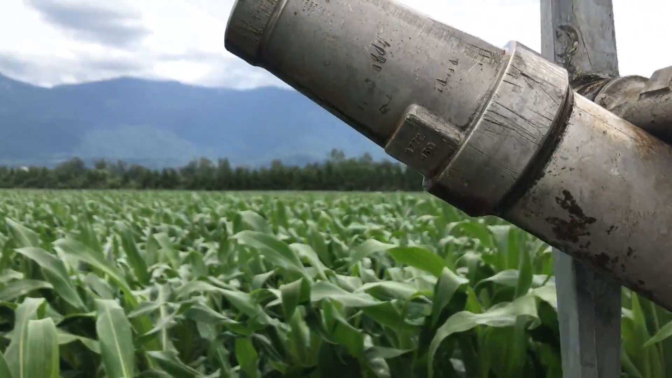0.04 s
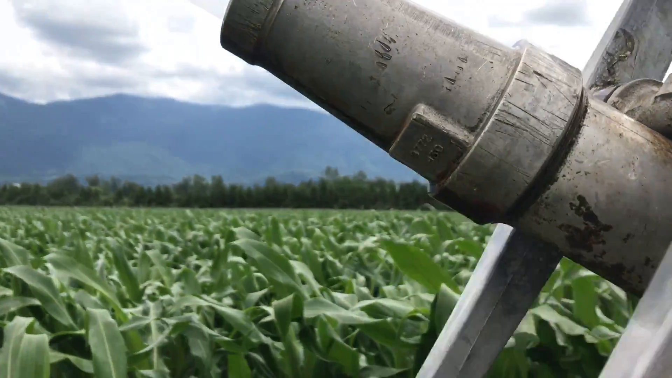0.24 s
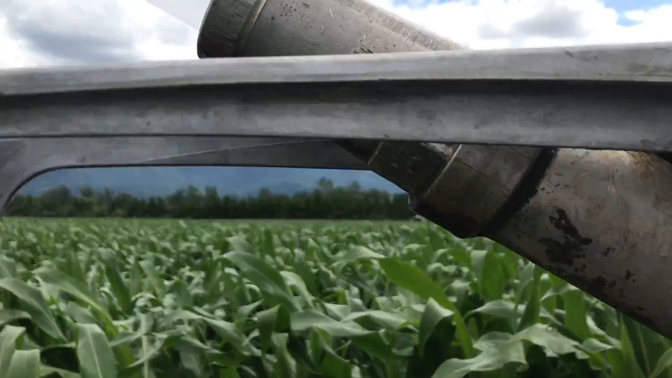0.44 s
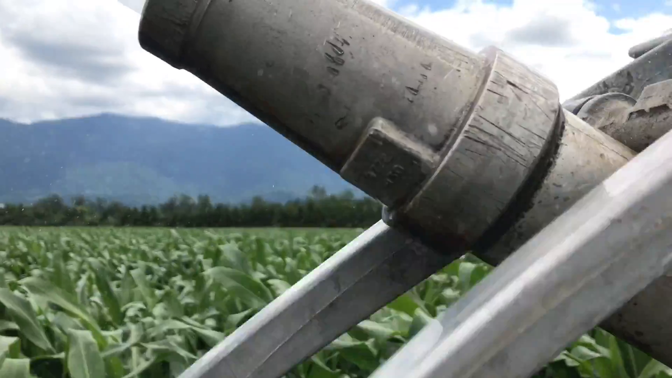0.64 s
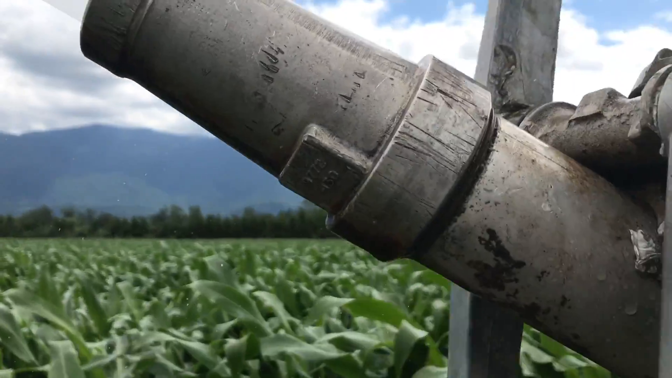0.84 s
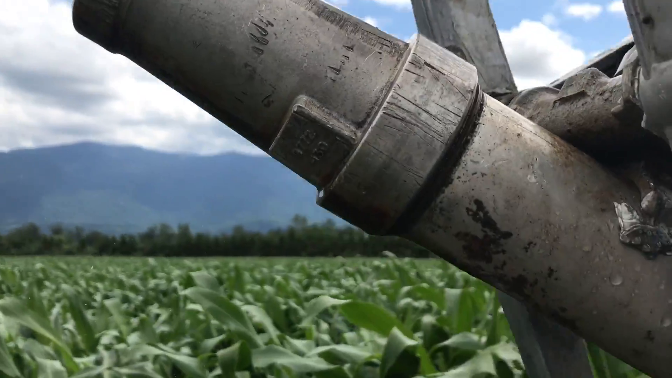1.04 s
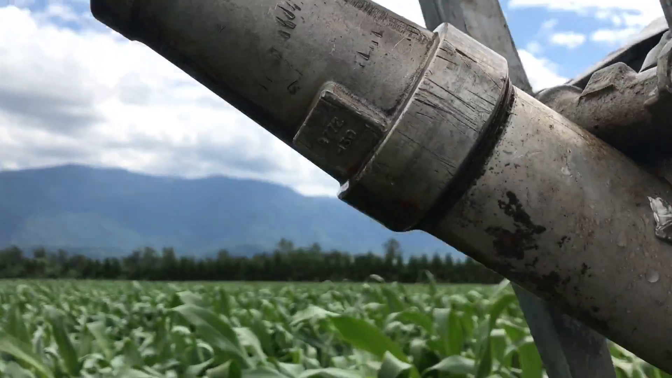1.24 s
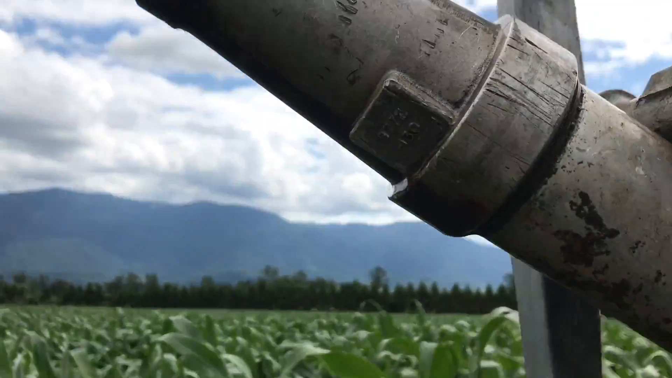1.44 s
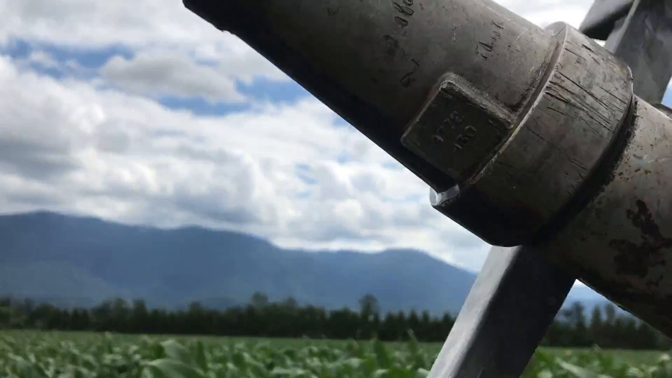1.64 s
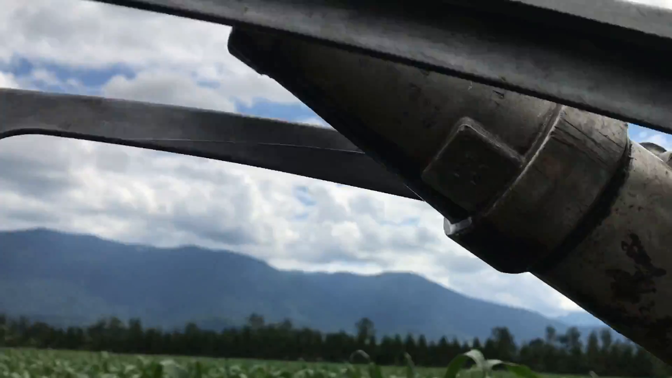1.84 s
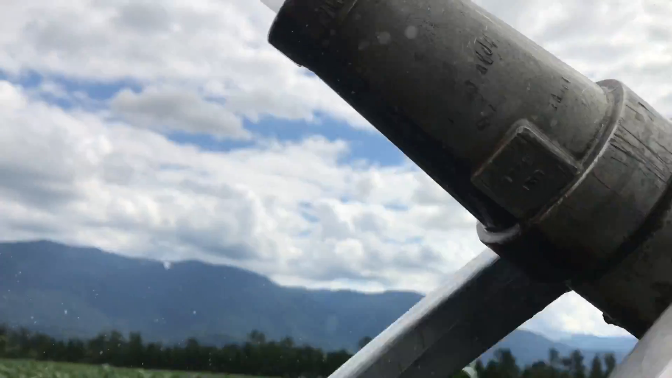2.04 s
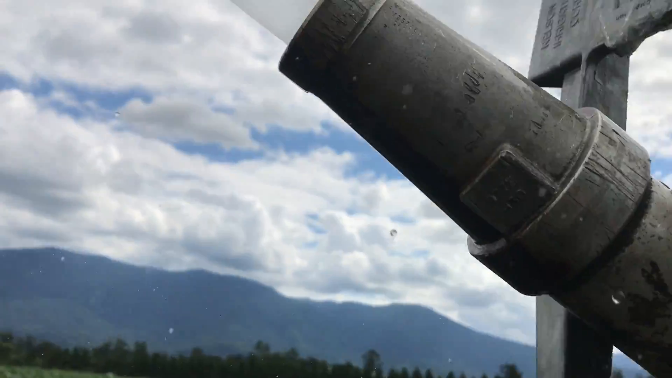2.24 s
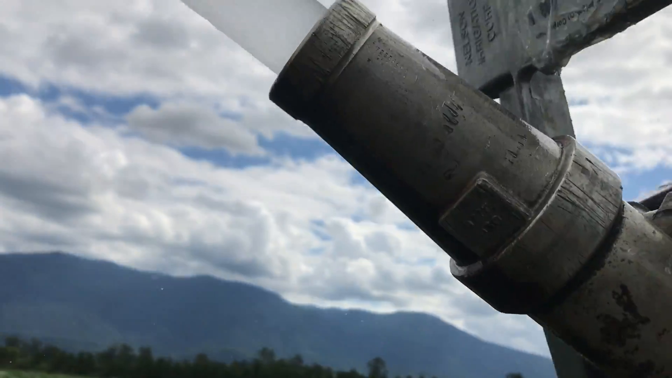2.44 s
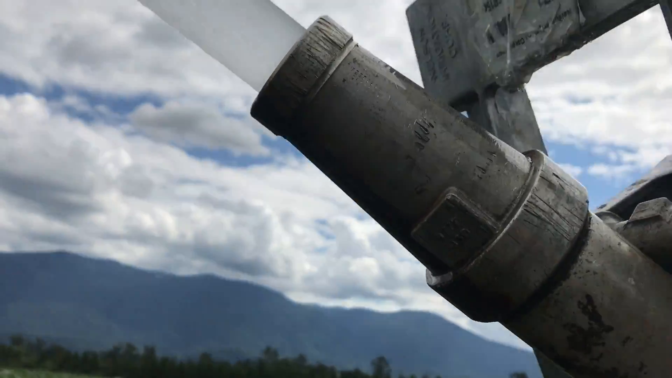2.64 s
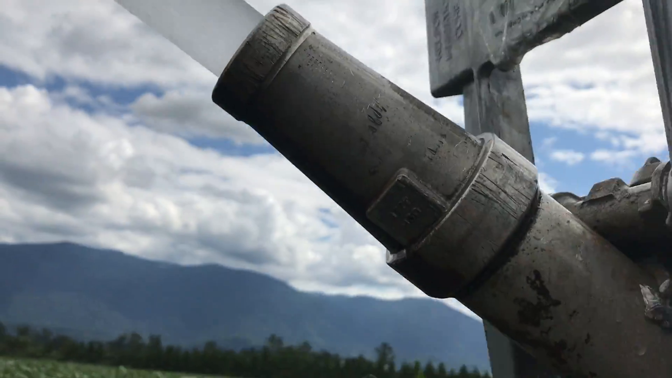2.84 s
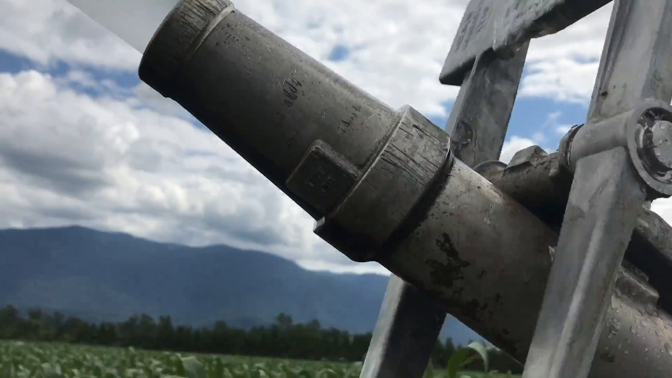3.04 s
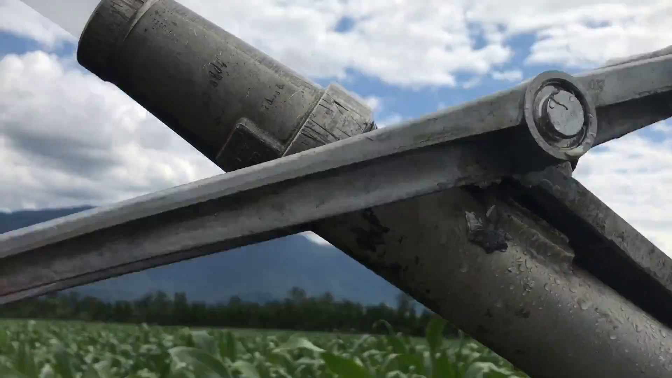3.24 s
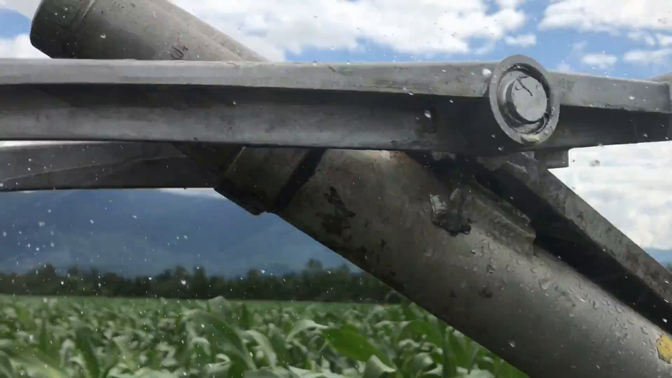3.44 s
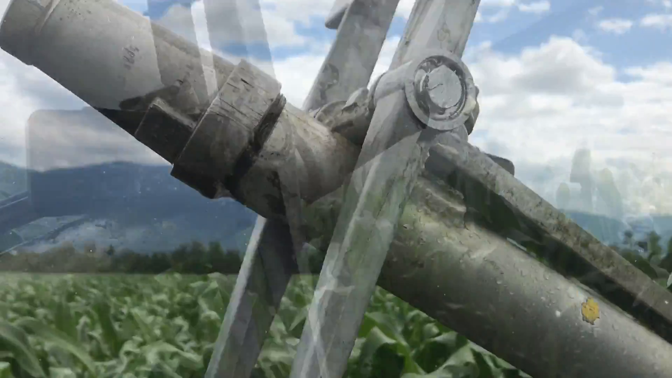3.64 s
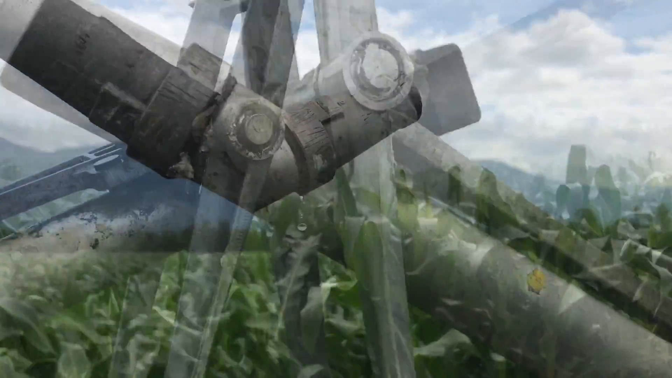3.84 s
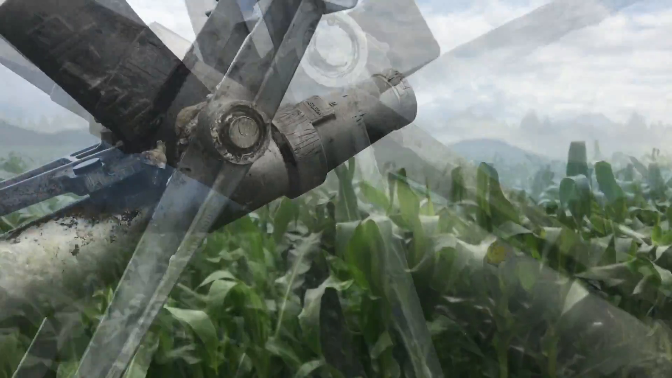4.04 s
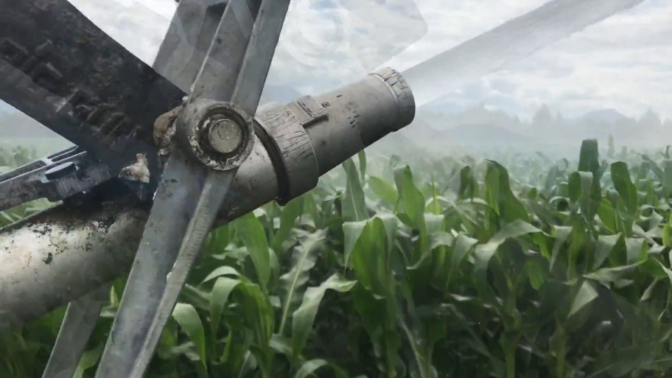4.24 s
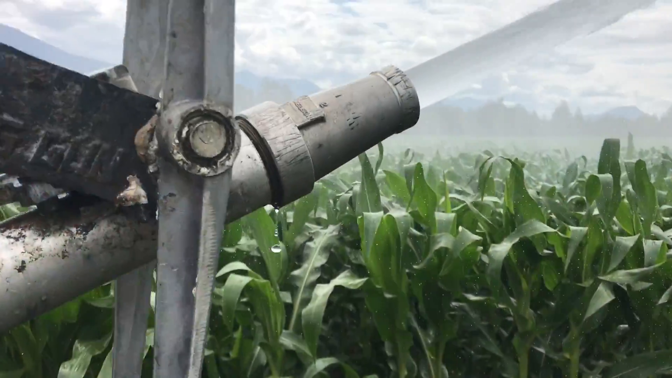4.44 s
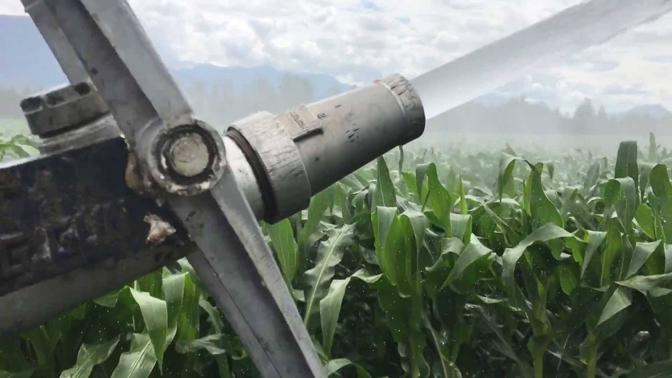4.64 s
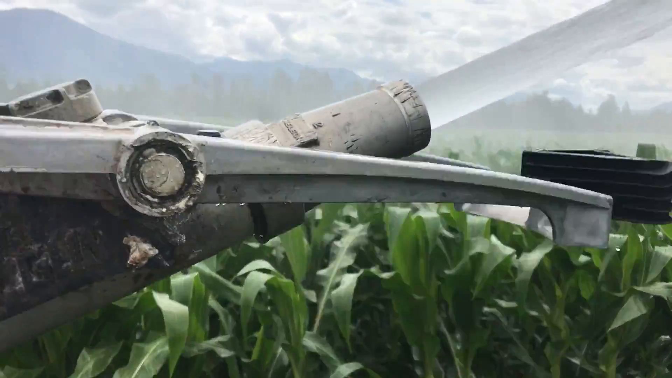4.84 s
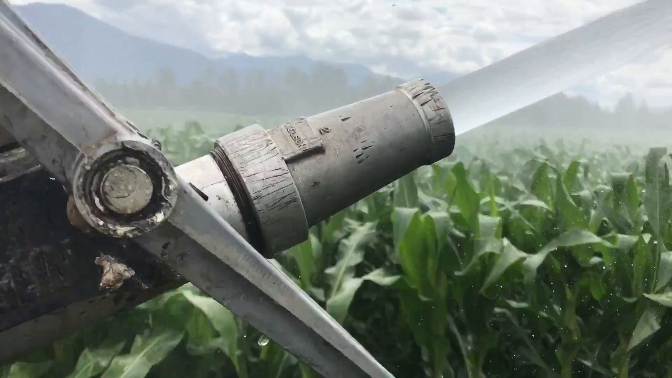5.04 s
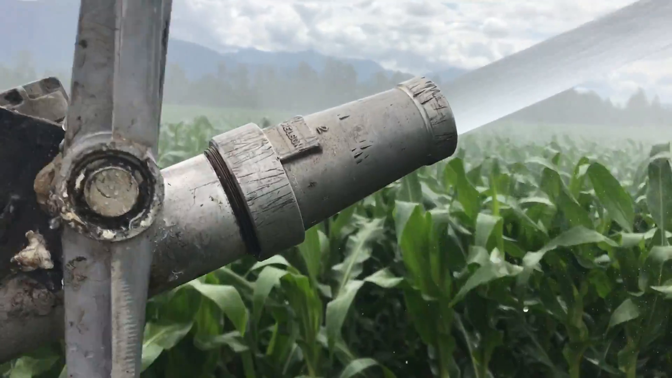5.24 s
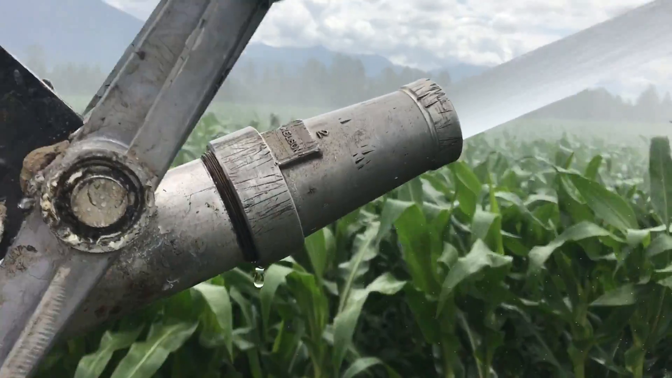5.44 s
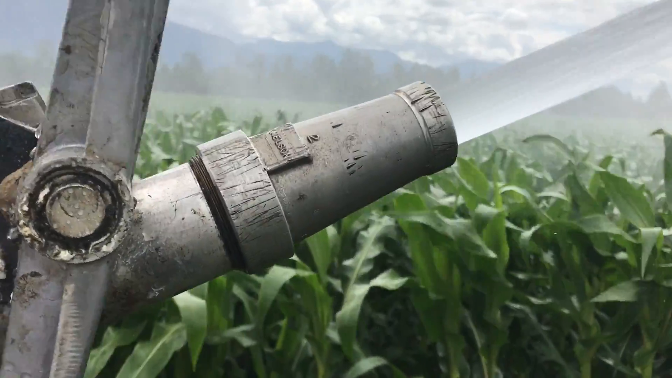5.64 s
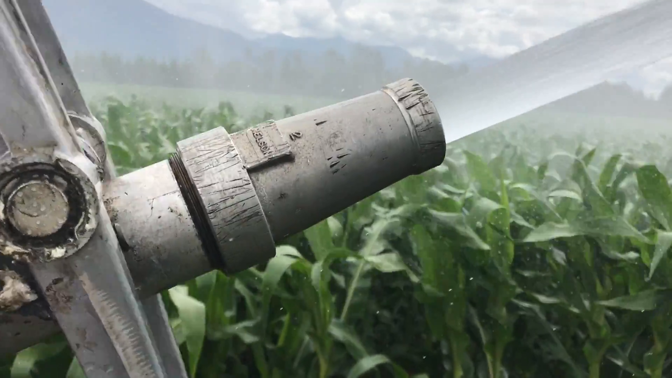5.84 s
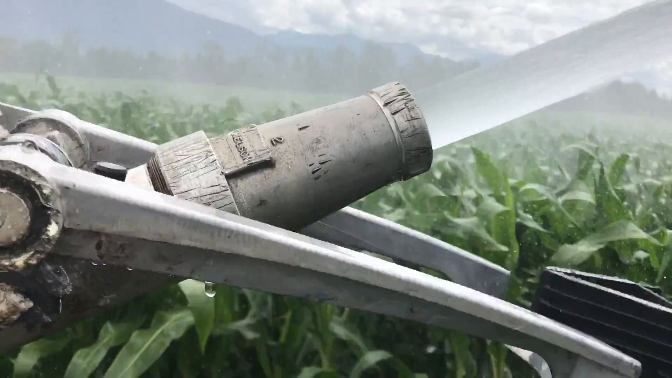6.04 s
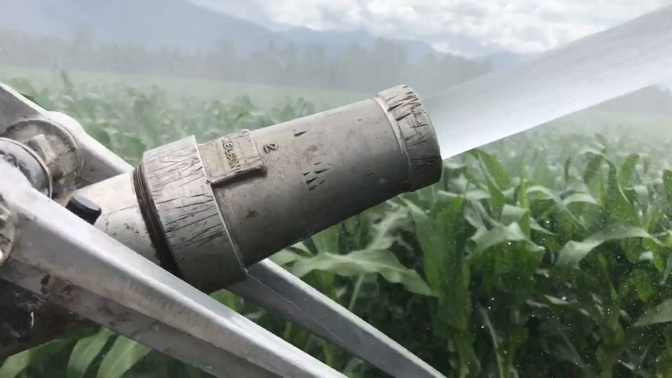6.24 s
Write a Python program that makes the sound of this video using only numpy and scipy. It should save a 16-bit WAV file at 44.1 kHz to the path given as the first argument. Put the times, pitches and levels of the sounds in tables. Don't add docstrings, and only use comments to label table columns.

```python
import sys
import numpy as np
from scipy import signal
from scipy.fft import rfft, irfft
from scipy.io import wavfile
from scipy.ndimage import uniform_filter1d, minimum_filter1d

SR = 44100
rng = np.random.default_rng(int(sys.argv[2]) if len(sys.argv) > 2 else 0)


def store_pcm(level_fs):
    pcm = np.round(np.clip(level_fs, -1, 1) * 32767).astype(np.int16)
    wavfile.write(sys.argv[1], SR, np.atleast_2d(pcm).T)


def convert_level_to_amplitude(level_db):
    exponent = np.asarray(level_db, float) / 20
    return 10 ** exponent


N = 277830
T = np.arange(N) / SR

CROSS_S = 3.05, 4.4

# (time [s], level [dB])
JET_LEVEL = [(0, -30), (.4, -30), (1.2, -30), (2.0, -30), (2.6, -28), (3.2, -31), (3.45, -32),
             (3.75, -35.5), (4.15, -34), (4.6, -31.5), (5.8, -30.5), (6.3, -31)]
# (frequency [Hz], density [dB per Hz])
HISS_TONE = [
    [(1760, -46), (3000, -9), (3480, -5.5), (4470, -1), (4860, -3.5), (5840, 1), (7560, -2), (8950, 0.5), (9730, -1), (10600, -6.5), (12100, -2.5), (14300, -6.5), (15100, -6), (16000, -15)],
    [(1760, -18), (3000, -8), (3200, -5.5), (3650, -7), (3970, -4), (4470, -3), (4860, -5), (5710, -2), (7250, -6), (8950, -5.5), (9730, -6), (10600, -8.5), (14900, -9), (16000, -16)],
]
# (frequency [Hz], density [dB per Hz])
ROAR_TONE = [
    [(120, -26), (200, -7), (352, -2), (512, -2), (692, -0.5), (911, -2), (1020, 1), (1910, -2), (4000, -2), (5200, -18), (8800, -120)],
    [(180, -17), (300, -5), (463, -5), (494, -2), (600, -1.5), (946, -1), (1520, 0.5), (2950, -11), (4000, -5.5), (5200, -33), (8800, -120)],
]
ROAR_DB = -5, -4
NEAR_DB, ROAR_LOSS = -29.5, 1.25
GAP_S = 0.224

# (time [s], rumble level [dB])
BREEZE = [(0, -47.5), (1.2, -46), (2.6, -46.5), (3.3, -43.5), (4.0, -45), (4.4, -37.5), (4.9, -42.5),
          (5.5, -34), (6.3, -41)]
# (time [s], rumble level [dB], flutter against rumble [dB], half length [s])
GUSTS = [(.89, -47, 8, .04), (2.25, -35, 4, .03), (2.807, -45, -20, 0.027), (3.08, -35, -19, 0.028),
         (3.403, -29, -12.5, .025), (3.577, -32, -9, .025), (3.79, -42, 3, .025), (3.883, -39, -10, .02),
         (4.36, -41, -12, 0.035), (4.819, -27, -9, 0.018), (4.927, -37, -13, 0.022),
         (5.101, -27, 2.5, 0.021), (5.24, -36.5, 9.5, 0.013), (5.282, -25, -6, 0.036),
         (5.461, -27, -1.5, 0.031), (5.542, -30.5, 0.1, 0.027), (5.612, -32, -3, 0.026),
         (5.68, -35, -22, .02), (5.816, -27.5, -6.5, 0.022), (5.851, -35.5, 8.5, 0.027),
         (5.992, -34, 11, 0.031), (6.037, -34, 5, 0.021), (6.16, -31, -15, .025),
         (6.226, -29.5, -11, 0.034)]
# (time [s], peak level [dB], frequency [Hz])
POPS = [(3.41, -21, 61.9), (5.094, -9.5, 185), (5.103, -19, 145), (5.264, -11, 93), (5.28, -16, 117),
        (5.434, -17, 63), (5.451, -6, 94), (5.499, -19, 64.6), (5.524, -15, 61.9), (5.615, -25, 61.4),
        (5.834, -13.5, 171), (5.974, -4.5, 292)]
# (frequency [Hz], density [dB per Hz])
RUMBLE_TONE = [(20, -34), (33, -2), (50, 3), (90, 2), (140, -5.5), (250, -21)]
# (frequency [Hz], density [dB per Hz])
FLUTTER_TONE = [(100, -12.5), (170, -3), (300, -6), (500, -14), (1000, -23.5)]
FLUTTER_DB = 1.5
SHUDDER_DB, SHUDDER_S = -29.5, 0.034

# (time [s], peak level [dB], crack centre [Hz], scrape length [s], stop ring level [dB])
KNOCKS = [(0.401, -12, 1510, 0.0041, -34), (.407, -6, 3000, .011, -34), (1.794, -8.5, 1400, .006, -17.5),
          (1.799, -1.5, 3170, 0.0044, -15), (3.262, -17, 1170, 0.0099, -24),
          (3.267, -4.5, 2680, .008, -22.5), (3.29, -21, 1500, .012, -27), (4.785, -5, 2100, 0.0024, -38),
          (4.795, -18, 1300, 0.0033, -36), (6.018, -7, 2300, 0.005, -36), (6.03, -15.5, 2500, .017, -36)]
# (frequency [Hz], density [dB per Hz])
THUD_TONE = [(150, -18), (280, -1), (600, 0), (900, -19)]
THUD_DB = -18
# (frequency [Hz], level [dB], t60 [s])
STOP_MODES = [(1128, -1, 0.086), (4100, -5, 0.064), (6230, -7, .04)]
# (frequency [Hz], level [dB], t60 [s])
ARM_MODES = [(1113, 1.5, 0.13), (1677, 4, 0.061), (2200, -6, 0.062), (2790, 4.5, 0.02), (3200, 2.5, 0.019),
             (4500, 3, 0.016), (6350, 4, 0.038)]
# (time [s], ring level [dB])
PINGS = [(.407, -16.5), (.666, -25), (.823, -29), (1.291, -37), (1.803, -22), (2.054, -17.5), (2.11, -30.5),
         (2.213, -27.5), (3.267, -19), (3.526, -26), (3.687, -30), (3.709, -24), (4.784, -11.5),
         (4.806, -16.5), (5.093, -21.5), (5.214, -17), (5.236, -28), (5.547, -26), (6.019, -12),
         (6.047, -15)]
# (frequency [Hz], level [dB], t60 [s])
BEAM_MODES = [(1479, 0.5, 0.092), (1600, -7, 0.044)]
# (time [s], peak level [dB], frequency [Hz])
TICKS = [(0.408, -15, 9200), (0.8545, -12, 8850), (0.8667, -10, 8800), (0.893, -12, 8880),
         (0.9153, -19, 8890), (0.9284, -17, 9170), (1.799, -9, 9300), (3.27, -14, 9150), (3.541, -21, 8800),
         (3.718, -16.5, 8740), (3.7294, -18, 9000), (3.7824, -18, 9000), (3.793, -21, 8950),
         (3.8197, -23, 8800), (4.804, -13.5, 8800), (5.2125, -15, 8700), (5.2416, -10.5, 8550),
         (5.2604, -18, 8730), (5.2884, -23, 8300), (5.555, -19, 8400), (6.0407, -18, 8900)]

# (time [s], level [dB], drip tail level [dB], spoon ring level [dB], change of the
# jet's level after it [dB])
CUTS = [
    (0.609, -1, -7, -20.5, -4.5),
    (2.001, 1.5, -16.5, -17.5, -5),
    (3.471, -2.5, -6, -17, -3),
    (5, -4.5, -7.5, -19, -2),
    (6.231, -2.5, -11, -20.5, 2.5),
]
# (frequency [Hz], density [dB per Hz])
SPRAY_TONE = [(88, -43), (150, -23.5), (905, -10.5), (1630, -11), (1940, -10.5), (2220, -3.5), (2870, -10),
              (3350, -4), (4860, -6), (6510, -3.5), (10600, -8.5), (14200, -14), (16000, -25)]
SPOON_HZ, SPOON_WIDTH_HZ = 1600, 370
CUT_S = 0.037

# (time [s], peak level [dB], hub ring level [dB])
CLACKS = [
    (.666, -5, -13),
    (2.055, -0.5, -3),
    (3.526, 0, -6),
    (5.547, -8, -26),
]
CLACK_HZ, CLACK_S = 2300, 0.0048
# (frequency [Hz], level [dB], t60 [s])
HUB_MODES = [(4094, -1.5, 0.048), (4190, -5.5, 0.032)]
# (time [s], peak level [dB], crack centre [Hz], scrape length [s])
RATTLES = [(.823, -11, 3090, .0035), (0.852, -19, 2810, 0.022), (0.871, -23, 1000, .008),
           (0.9, -14.5, 1700, .0077), (0.928, -19.5, 885, 0.016), (1.239, -12.5, 2300, .0045),
           (1.27, -24, 2500, .008), (1.29, -14, 1600, 0.0075), (1.832, -20, 1300, .005),
           (2.213, -9.5, 3320, .0072), (2.241, -11.5, 2250, 0.01), (2.261, -12.5, 6000, .004),
           (2.277, -14.5, 3470, 0.011), (2.287, -14, 2500, 0.0049), (2.716, -17, 4500, 0.0076),
           (3.683, -15, 3000, 0.009), (3.705, -17.5, 2000, 0.025), (3.729, -13.5, 2200, 0.0076),
           (3.742, -18, 3000, .015), (5.023, -5, 2200, 0.0044), (5.067, -20, 1490, .03),
           (5.094, -13.5, 1480, .005), (5.205, -15, 2900, .0068), (5.213, -19, 2500, .004),
           (5.237, -8, 1850, 0.0049), (5.246, -15.5, 1160, 0.025), (5.593, -12, 1280, 0.0036),
           (5.63, -20, 980, .006), (6.047, -16, 2300, .01), (6.288, -13, 985, .0039)]

TREBLE_PATCHES_PER_S, TREBLE_PATCH_DB = 6.5, -2.5


def colour(x, spectrum):
    hz, db = np.transpose(spectrum)
    f = np.maximum(np.fft.rfftfreq(len(x), 1 / SR), 1)
    gain_db = np.interp(np.log(f), np.log(hz), db, left=-80, right=-80)
    y = irfft(rfft(x) * convert_level_to_amplitude(gain_db), len(x))
    return y / np.std(y)


def level_curve(table):
    s, db = np.transpose(table)
    return np.interp(T, s, db)


def crossing():
    return np.interp(T, CROSS_S, [0, 1])


def walk(rate):
    k = max(int(SR / rate), 1)
    steps = np.repeat(rng.standard_normal(N // k + 1), k)
    w = uniform_filter1d(uniform_filter1d(steps, k), k)[:N]
    return w / np.std(w)


def patter(rate, spread_db):
    return rng.standard_normal(N) * convert_level_to_amplitude(spread_db * walk(rate))


def add(out, s, x):
    i = int(s * SR)
    out[i:i + len(x)] += x[:N - i]


def ring(x, hz, t60):
    pole = np.exp(2j * np.pi * hz / SR - np.log(1000) / (t60 * SR))
    y = signal.lfilter([1], [1, -pole], x).imag
    return y / np.max(np.abs(y))


def peal(db, modes):
    t = T[:SR // 8]
    out = np.zeros(len(t))
    for hz, mode_db, t60 in modes:
        moment = .0005 + .001 * rng.random()
        tap = np.exp(-((t - moment) * hz * 4) ** 2)
        out += convert_level_to_amplitude(db + mode_db) * ring(tap, hz, t60)
    return out


def blow(out, s, db, hz, length, ring_db=-60., modes=()):
    t, length = T[:SR // 8], max(length, 5e-4)
    roughness = np.repeat(rng.standard_normal(len(t) // 40 + 1), 40)[:len(t)]
    grit = rng.standard_normal(len(t)) * convert_level_to_amplitude(1.8 * roughness)
    scrape = grit * (1 - np.exp(-t / .0003)) * np.exp(-(t / length) ** 1.5)
    clatter = scrape + convert_level_to_amplitude(-11) * grit * np.exp(-t / .012)
    crack = colour(clatter, [(hz / 5, -19), (hz / 1.3, -3), (hz, 0), (hz * 1.32, -4), (hz * 4.5, -22)])
    crack = crack * (t < .1)
    chance = rng.uniform(-0.82, 1, (len(ARM_MODES), 2))
    body = np.zeros(len(t))
    for (f, mode_db, t60), (strength, detune) in zip(ARM_MODES, chance):
        body_db = mode_db + 3.5 * strength - 18.0 - 7.3 * abs(np.log2(f / hz))
        body += convert_level_to_amplitude(body_db) * ring(scrape, f * (1 + 0.047 * detune), t60)
    crack = crack / np.std(crack[:int(length * SR)]) / 3
    add(out, s - .0005, convert_level_to_amplitude(db - 1.5) * (crack + body) + peal(ring_db, modes))


def jet():
    hiss_db = level_curve(JET_LEVEL)
    roar_db = np.interp(T, CROSS_S, ROAR_DB) - ROAR_LOSS * np.maximum(hiss_db - NEAR_DB, 0)
    after_db = np.zeros(N)
    for s, *_, gap_db in CUTS:
        since = T - s
        refill = 0.11 * np.exp(-np.abs(since - GAP_S) / 0.024)
        after_db += gap_db * (since > 0) * np.where(since < GAP_S, 1, refill)
    after_db = uniform_filter1d(after_db, size=400)
    turn = crossing()
    hiss_noise, roar_noise = patter(1500, 0.95), patter(300, 0.54)
    hiss = (1 - turn) * colour(hiss_noise, HISS_TONE[0]) + turn * colour(hiss_noise, HISS_TONE[1])
    roar = (1 - turn) * colour(roar_noise, ROAR_TONE[0]) + turn * colour(roar_noise, ROAR_TONE[1])
    hiss = hiss * convert_level_to_amplitude(hiss_db + after_db + .45 * walk(14))
    roar = roar * convert_level_to_amplitude(hiss_db + roar_db + after_db + .9 * walk(11))
    return hiss + roar


def wind():
    rumble = convert_level_to_amplitude(level_curve(BREEZE))
    flutter = rumble * convert_level_to_amplitude(FLUTTER_DB - 7.1 * crossing())
    shudders = [(s + CUT_S, db + SHUDDER_DB, -3.0, SHUDDER_S) for s, db, *_ in CUTS]
    for s, db, flutter_db, half in list(GUSTS) + shudders:
        swell = convert_level_to_amplitude(db) * np.exp(-((T - s) / half) ** 2)
        rumble = rumble + swell
        flutter = flutter + convert_level_to_amplitude(flutter_db) * swell
    out = colour(rng.standard_normal(N), RUMBLE_TONE) * rumble * convert_level_to_amplitude(-2.0 + 1.7 * walk(18))
    out += colour(rng.standard_normal(N), FLUTTER_TONE) * flutter * convert_level_to_amplitude(-1.5 + 1.8 * walk(30))
    t = T[:SR // 10]
    for s, db, hz in POPS:
        swell = np.exp(-t * hz / 1.1) * (1 - np.exp(-t * hz / 0.094))
        add(out, s, convert_level_to_amplitude(db - 4.0) * np.sin(2 * np.pi * hz * t) * swell)
    return out


def knocks():
    out, t = np.zeros(N), T[:SR // 8]
    for s, db, hz, length, stop_db in KNOCKS:
        blow(out, s, db, hz, length, stop_db, STOP_MODES)
        thud = colour(rng.standard_normal(len(t)), THUD_TONE)
        thud = thud * (1 - np.exp(-t / 0.0015)) * np.exp(-t / .008)
        add(out, s, convert_level_to_amplitude(db + THUD_DB) * thud)
    return out


def pings():
    out = np.zeros(N)
    for s, db in PINGS:
        add(out, s - .0005, peal(db, BEAM_MODES))
    return out


def ticks():
    out, t = np.zeros(N), T[:SR // 40]
    for s, db, hz in TICKS:
        tap = rng.standard_normal(len(t)) * t * np.exp(-t / 0.00053)
        edge = colour(tap, [(.5 * hz, -20), (.78 * hz, 0), (1.1 * hz, -3), (1.3 * hz, -20)])
        blip = ring(tap, hz, .011) + convert_level_to_amplitude(-15) * edge / np.max(edge)
        add(out, s - .0005, convert_level_to_amplitude(db) * blip)
    return out


def splashes():
    burst, drips, hum, t = np.zeros(N), np.zeros(N), np.zeros(N), T[:SR // 5]
    rise = np.clip(t / 0.0064, 0, 1) ** 2
    after = np.maximum(t - .005 - CUT_S, 0)
    for s, db, tail_db, ring_db, _ in CUTS:
        add(burst, s - .005, convert_level_to_amplitude(db - 9) * rise * np.exp(-after / .003))
        add(drips, s - .005, convert_level_to_amplitude(db - 9 + tail_db) * rise * np.exp(-after / .022))
        add(hum, s - .005, convert_level_to_amplitude(db + ring_db) * rise * np.exp(-after / 0.0038))
    spray = colour(patter(1800, 0.58), SPRAY_TONE) * convert_level_to_amplitude(2.0 * walk(200))
    turn = crossing()
    middle = signal.butter(1, [2400, 4000], "bandpass", fs=SR, output="sos")
    spray -= 0.33 * turn * signal.sosfiltfilt(middle, spray)
    mist = colour(patter(1800, .9), [(11000, -5), (14500, 0), (16500, -4)])
    spray += convert_level_to_amplitude(-10) * turn * mist
    dull = colour(patter(530, 2.2), [(300, -14), (1500, 9.5), (5000, 3), (15000, -8)])
    spoon_tone = [(SPOON_HZ - SPOON_WIDTH_HZ, -14), (SPOON_HZ, 0), (SPOON_HZ + SPOON_WIDTH_HZ, -14)]
    spoon = colour(rng.standard_normal(N), spoon_tone)
    return burst * spray + drips * dull + hum * spoon


def clacks():
    out = np.zeros(N)
    for s, db, hub_db in CLACKS:
        blow(out, s, db, CLACK_HZ, CLACK_S, hub_db, HUB_MODES)
    return out


def rattles():
    out = np.zeros(N)
    for s, db, hz, length in RATTLES:
        blow(out, s, db, hz, length)
    return out


def scene():
    water = jet() + splashes()
    metal = knocks() + pings() + ticks() + clacks() + rattles()
    mono = water + metal + wind()
    return np.array([mono, mono])


def treble_patches(mono):
    side, window = np.zeros(N), np.hanning(2048) ** .5
    for when, pitch, width in rng.random((int(TREBLE_PATCHES_PER_S * N / SR), 3)):
        i, hz = int(when * (N - 2048)), 5500 + 9500 * pitch
        half_hz = 800 + 600 * width
        noise = colour(rng.standard_normal(2048), [(hz - half_hz, 0), (hz + half_hz, 0)])
        loudness = min(np.median(np.abs(mono[i:i + 2048])), .02)
        share = np.sqrt(2 * half_hz / 11000) * loudness
        side[i:i + 2048] += convert_level_to_amplitude(TREBLE_PATCH_DB) * share * window * noise
    return side


def roll_off(x):
    return signal.sosfilt(signal.butter(12, 16510, fs=SR, output="sos"), x)


def record(dry):
    peak = -minimum_filter1d(-np.abs(dry[0]), size=65)
    held = dry * uniform_filter1d(np.minimum(1, .86 / (peak + 1e-9)), size=33)
    held = signal.sosfilt(signal.ellip(8, .2, 60, 15800, fs=SR, output="sos"), held)
    held = signal.sosfilt(signal.butter(2, 36, "highpass", fs=SR, output="sos"), held)
    side = treble_patches(held[0])
    return roll_off(held + np.array([side, -side]))


dry = scene()
out = record(dry)
store_pcm(out)
```